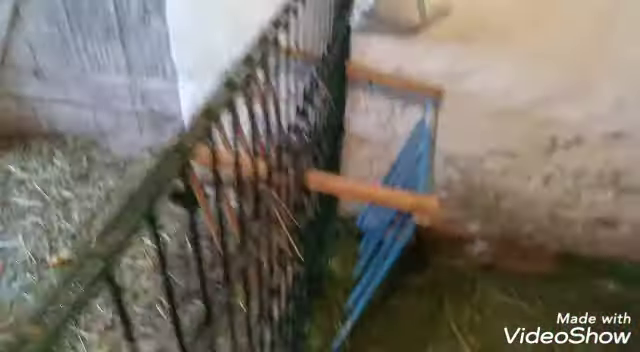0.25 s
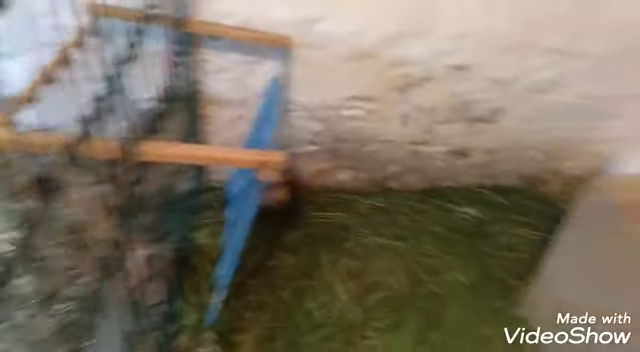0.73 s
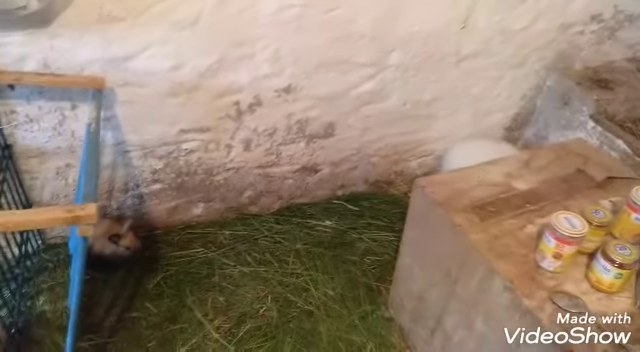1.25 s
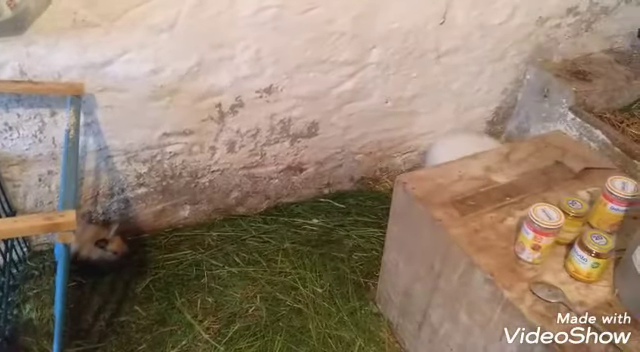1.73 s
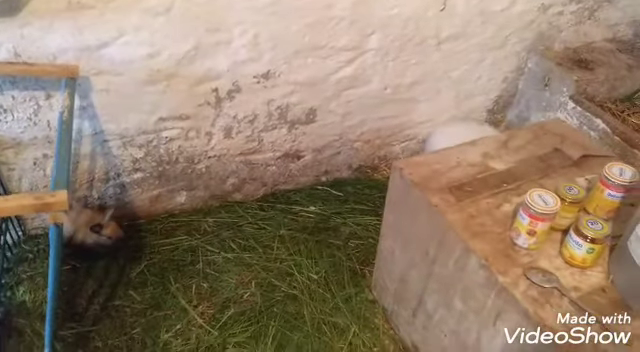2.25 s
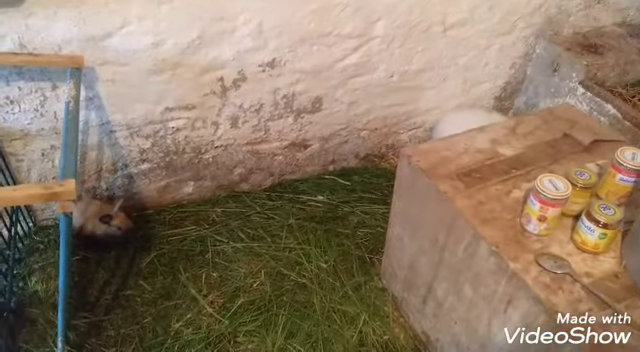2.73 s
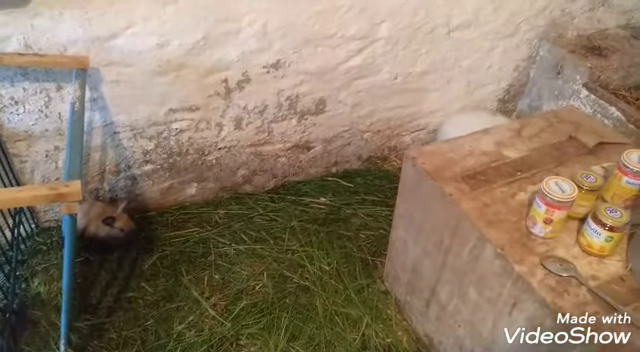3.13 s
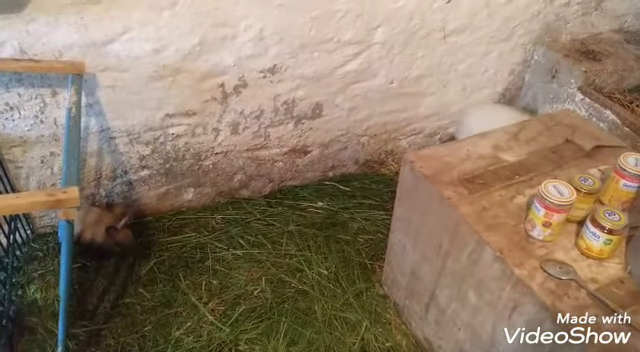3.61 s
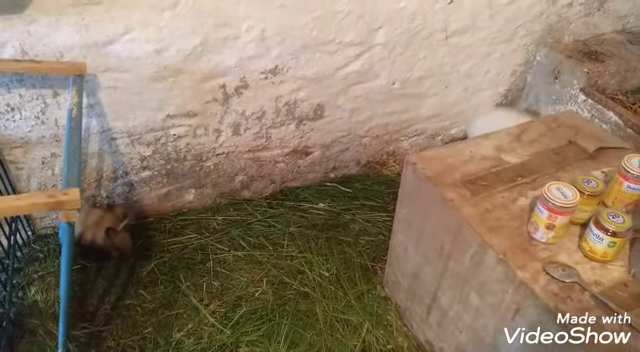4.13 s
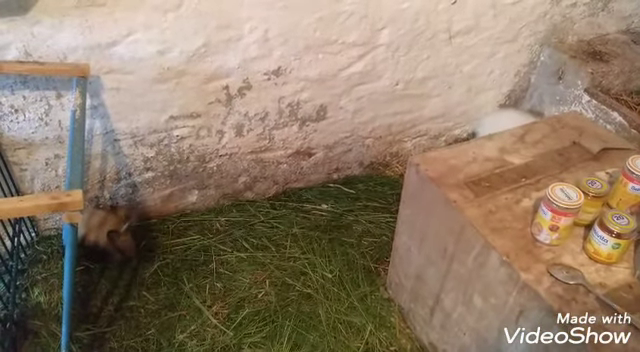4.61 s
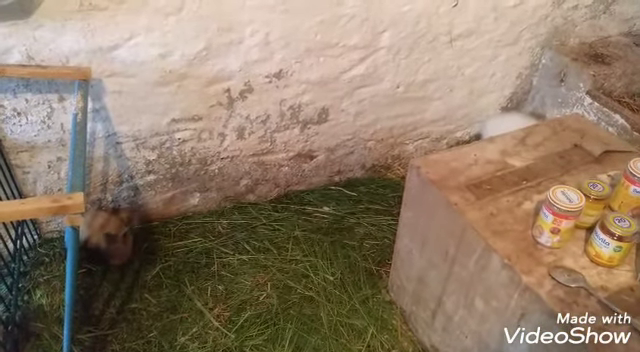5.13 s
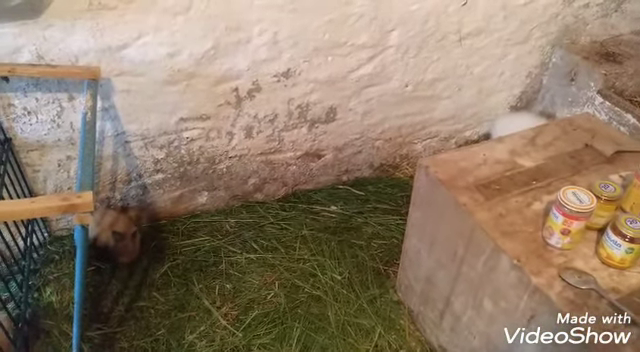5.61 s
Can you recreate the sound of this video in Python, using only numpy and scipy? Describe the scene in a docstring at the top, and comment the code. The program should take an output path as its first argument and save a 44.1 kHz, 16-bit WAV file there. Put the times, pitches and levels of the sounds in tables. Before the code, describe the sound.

A guinea pig in a hard-walled barn pen repeats short squeaky whistles about three times a second, over faint grass rustle.

```python
"""A guinea pig squeaks about three times a second in a hard-walled barn pen, a little to the right.
Each call has two voices: a thin whistle near 6 kHz and a low arched note that chops it into side tones.
The note is a sum of harmonics; it drops and breaks into a huff of shaped noise with a soft thump.
Grass rustles as bursts of crackling noise, echoes and room modes ring on, and faint air noise lies below."""
import sys
import numpy as np
from scipy import signal
from scipy.fft import rfft, irfft, next_fast_len
from scipy.io import wavfile
from scipy.ndimage import uniform_filter1d

SR = 44100
rng = np.random.default_rng(int(sys.argv[2]) if len(sys.argv) > 2 else 0)


def put_to_file(sound):
    """Save the sound as 16-bit audio at rate SR, in the file named by the first command-line argument."""
    columns = np.atleast_2d(sound).T  # one column per channel
    safe = np.clip(columns, -1, 1)
    whole_steps = np.round(safe * 32767)
    wavfile.write(sys.argv[1], SR, whole_steps.astype(np.int16))


N = 258411
TIME = np.arange(N) / SR

# low notes: (start [s], rise [s], fall [s], top [Hz], end [Hz], level [dB], swell from onset to top [dB],
#             overtones [dB], second partial lift [dB], closing rasp [dB], thump [dB])
LOW_NOTES = [ (-.06, 0.038, 0.036, 575, 565, -35.5, 5, -61, -5, -80, -82),
             (0.186, 0.045, .07, 808, 816, -22.5, 2, -47.5, -3, -70, -64),
             (1.011, .014, .046, 570, 390, -28, -4.5, -45, 2.5, -38, -43.5),
             (1.288, 0.042, 0.033, 500, 394, -28, 6.5, -47, 10, -36.5, -44),
             (1.604, .047, 0.039, 502, 395, -30, 4, -44, 4.5, -39, -42.5),
             (1.944, 0.063, 0.022, 592, 395, -28.5, -1, -44, 2.5, -43.5, -57),
             (2.308, 0.053, 0.027, 585, 396, -27, -1, -42, 3.5, -43.5, -42),
             (2.641, 0.076, .028, 828, 760, -19.5, 8.5, -41.5, 11, -43.5, -50.5),
             (2.857, .009, .026, 690, 520, -33.5, -8, -56, 1, -75, -76),
             (3.123, .018, .07, 380, 310, -44, -5, -46.5, 6.5, -47, -48),
             (3.468, 0.035, 0.071, 532, 399.6, -27.5, 9.5, -46, 8, -48.5, -56.5),
             (3.817, 0.015, .056, 425, 295, -40.5, -7.5, -49, 14, -43, -43),
             (4.131, 0.048, 0.037, 630, 404, -29.5, 2, -45, -7, -40, -46),
             (4.452, 0.038, 0.039, 488, 394.6, -29.5, 9, -45.5, 6.5, -39.5, -43.5),
             (4.793, 0.036, 0.038, 530, 389.4, -28.5, 7.5, -47, 6.5, -42, -43),
             (5.113, 0.055, 0.038, 514, 392.4, -28, 11.5, -46.5, 7.5, -41, -43.5),
             (5.472, 0.061, 0.049, 712, 512, -27.5, 9, -42.5, -1.5, -48.5, -57)]


def amp(db):
    """Decibels to gain."""
    return 10 ** (np.asarray(db) / 20)


def unit(x):
    """Scales to rms 1."""
    return x / np.sqrt(np.mean(x ** 2) + 1e-20)


def read(points, hz):
    """Reads a table on a log-frequency axis."""
    f, value = np.transpose(points)
    return np.interp(np.log(hz + 1), np.log(f + 1), value)


def colour(x, points):
    """Filters by a spectrum in dB."""
    size = next_fast_len(N + 4096)
    gain = amp(read(points, np.fft.rfftfreq(size, 1 / SR)))
    return irfft(rfft(x, size) * gain, size)[..., :N]


def wobble(rate_hz):
    """Low-passed noise of rms 1."""
    lowpass = signal.butter(2, min(rate_hz, 9000), fs=SR, output="sos")
    return unit(signal.sosfilt(lowpass, rng.standard_normal(N)))


def play(calls, fade_s):
    """Joins calls into a gate and one control curve per column."""
    gate = np.zeros(N)
    for call in calls:
        to_edge_s = np.minimum(TIME - call[0][0], call[-1][0] - TIME)
        gate += np.clip(to_edge_s / fade_s + .5, 0, 1)
    gate = np.sin(np.pi / 2 * np.minimum(gate, 1)) ** 2
    s, *columns = np.concatenate(calls).T
    return [gate] + [np.interp(TIME, s, column) for column in columns]


def swell(s, rise_s, fall_s):
    """A bell-shaped envelope with its top at s."""
    return np.exp(-((TIME - s) / np.where(TIME < s, rise_s, fall_s)) ** 2)


def note(start, rise_s, fall_s, top_hz, end_hz, db, swell_db, over_db, lift_db, *huff):
    """One arch of the low voice: rows of (s, Hz, dB, overtones dB, second partial dB, looseness 0-1)."""
    t = np.linspace(0, rise_s + fall_s, num=60)
    early, down = np.clip(1 - t / rise_s, 0, 1), np.clip((t - rise_s) / fall_s, 0, 1)

    # slides up by a share of its pitch, then drops fast and settles
    scoop_share, scoop_bend, drop_bend = .11, 1.6, 2.2
    hz = end_hz + (top_hz - end_hz) * (1 - down) ** drop_bend
    hz = hz * (1 - scoop_share * early ** scoop_bend)

    # the fundamental needs a moment to speak, and swells to the top
    attack_s, attack_db, swell_bend = 0.0059, 14.5, 0.4
    onset_db = attack_db * np.exp(-t / attack_s) + swell_db * early ** swell_bend

    # flares as the pitch breaks; place and width are shares of the fall
    break_db, break_at, break_width = 2.5, 0.37, 0.56
    flare_db = break_db * np.exp(-((down - break_at) / break_width) ** 2)

    # notes that end low keep their level; higher ones fade fully
    held_hz, faded_hz, full_fade_db, fade_bend = 284.2, 382.9, 14, 0.88
    fade_db = full_fade_db * np.interp(end_hz, [held_hz, faded_hz], [0, 1]) * down ** fade_bend

    # overtones come in late, and dip while the pitch breaks
    over_onset_db, over_break_db = 3, 6
    overtones_db = over_db - over_onset_db * early ** 2 - over_break_db * np.sin(np.pi * down)

    lift_growth_db = 4.5  # the second partial grows as the mouth opens
    lift_db = lift_db + lift_growth_db * (np.sin(np.pi * down) - early)

    slack_onset = .3  # looseness already there before the break
    loose = slack_onset + (1 - slack_onset) * np.sqrt(down)
    return np.transpose([start + t, hz, db - onset_db + flare_db - fade_db, overtones_db, lift_db, loose])


def low_voice(jitter=.011, slack_jitter=.035, slack_hz=480, shimmer=0.009, flutter_db=3.0,
              slope_db_per_octave=5, fray_rad=0.12, hiss_db=-8):
    """A strong fundamental with overtones shaped by the throat; also returns its cycle and when it sounds."""
    # throat colour: (frequency [Hz], gain [dB])
    throat = [(600, -7), (850, -1.5), (1050, 0.5), (1250, 8), (1420, 8), (1620, -5.5), (1800, 3),
              (2080, 6.5), (2500, 4.5), (3100, -11), (4000, -14), (6000, -37.5), (15500, -21)]
    gate, hz, db, over_db, lift_db, loose = play([note(*row) for row in LOW_NOTES], 0.018)
    slack = loose * np.clip((slack_hz - hz) / 120, 0, 1)  # loose folds at low pitch beat unevenly
    hz = hz * (1 + (jitter + slack_jitter * slack) * wobble(220))
    cycle = 2 * np.pi * np.cumsum(hz) / SR

    overtones = np.zeros(N)
    for k in range(2, 10):
        partial_db = read(throat, k * hz) + (k == 2) * lift_db - slope_db_per_octave * np.log2(k / 2)
        partial_db = partial_db + flutter_db * wobble(30.53)
        overtones += amp(partial_db) * np.cos(k * cycle + fray_rad * (k - 2) * wobble(220))

    # air leaks through the folds once a cycle
    leak = rng.standard_normal(N) * (1 + np.cos(cycle))
    hiss = unit(colour(leak, [(150, 2)] + throat))
    upper = overtones + amp(hiss_db + 1.8 * slack) * hiss
    tone = amp(db) * np.cos(cycle) + amp(over_db) * upper
    roughness = 1 + (shimmer + 0.42 * slack) * wobble(218)
    return np.sqrt(2) * gate * roughness * tone, cycle, uniform_filter1d(gate, size=600)


def swoop(start, lead_s, sag_s, flip_s, crest_hz, dip_hz, end_hz, crest_db, dip_db, end_db, chop):
    """One whistle creeps in, sags and flips up: rows of (s, Hz, dB, share chopped)."""
    lead_scoop, lead_db = .02, 18.5  # creeps in a little flat and faint
    sag_settle_s, hold_s, hold_db = 0.054, .014, 2.5  # sags toward a low pitch; holds briefly as it dies
    flip_chop = 0.5  # share of the chopping left once flipped up
    stages = np.cumsum([0, lead_s, sag_s, flip_s, hold_s])
    t = np.linspace(0, stages[-1], num=90)
    lead, sag, flip = (np.interp(t, pair, [0, 1]) for pair in zip(stages[:-2], stages[1:]))
    sag = np.expm1(-sag * sag_s / sag_settle_s) / np.expm1(-sag_s / sag_settle_s)
    flip = np.sin(np.pi / 2 * flip) ** 2
    hz = crest_hz + (dip_hz - crest_hz) * sag + (end_hz - dip_hz) * flip
    hz = hz * (1 - lead_scoop * (1 - lead))
    level_db = np.interp(t, stages, [crest_db - lead_db, crest_db, dip_db, end_db, end_db - hold_db])
    return np.transpose([start + t, hz, level_db, chop * (1 - (1 - flip_chop) * flip)])


def whistle(cycle, buzz, jitter=0.00069, rough=0.0022, weak_jitter=0.01197, open_share=0.069, chop_db=3.5,
            octave_db=-11, pure_octave_db=3, octave_growth=0.13, octave_flutter_db=3, flutter_db=2.5,
            breath_db=-24):
    """A near-pure whistle; each low-voice cycle bends it and lets a burst through, throwing out side tones."""
    # (start [s], lead [s], sag [s], flip [s], crest [Hz], dip [Hz], end [Hz],
    #  crest level [dB], dip level [dB], end level [dB], share chopped by the low note [0-1])
    whistle_rows = [ (-.1, 0.034, 0.034, 0.033, 5800, 5700, 5770, -50, -43, -48.5, 0.1),
                    (.151, .048, .19, 0.0258, 5793, 5515, 5610, -34.5, -39.5, -43.5, 0.09),
                    (.578, 0.0218, .125, 0.085, 5776, 5565, 5827, -44.5, -41.5, -39.5, 0),
                    (.955, 0.044, .03, 0.025, 5880, 5720, 6300, -42.5, -45.5, -56.5, 1),
                    (1.251, 0.037, 0.032, 0.023, 5980, 5800, 6520, -44, -41, -50, .9),
                    (1.556, 0.042, 0.033, .032, 6050, 5860, 6370, -44.5, -42.5, -42, 0.78),
                    (1.899, 0.042, 0.058, 0.032, 6240, 5880, 6403, -47, -49.5, -41.5, 0.92),
                    (2.266, 0.04, 0.05, .03, 6220, 5900, 6450, -45.5, -46, -46.5, 1),
                    (2.604, 0.034, 0.083, 0.07, 6280, 5700, 5955, -43, -39, -37.5, 0.59),
                    (2.8, 0.035, 0.016, 0.0364, 5800, 5670, 5970, -42.5, -51.5, -51, 0.95),
                    (3.031, 0.054, 0.047, .045, 5960, 5780, 6720, -51, -53.5, -53.5, 1),
                    (3.426, 0.048, 0.035, 0.036, 6170, 5850, 6500, -50.5, -47.5, -42, 0.93),
                    (3.77, .045, .025, 0.0366, 6110, 5900, 6690, -52.5, -48.5, -55.5, 1),
                    (4.099, 0.038, 0.039, 0.025, 6250, 5780, 6270, -49, -44, -48.5, .95),
                    (4.417, 0.041, 0.042, .025, 6250, 5900, 6568, -50.5, -48.5, -49, 0.97),
                    (4.753, 0.045, 0.03, 0.036, 6200, 5950, 6540, -50.5, -46.5, -47.5, 0.81),
                    (5.077, 0.052, 0.042, 0.042, 6190, 5880, 6550, -45.5, -51.5, -42.5, 0.94),
                    (5.433, 0.031, 0.072, 0.1, 6284, 5820, 6175, -37.5, -48, -42.5, 0.93),
                    (5.838, 0.028, 0.039, .03, 6380, 6000, 6500, -51, -45, -45, 0)]
    # whistle colour: (frequency [Hz], gain [dB])
    squeak_colour = [(1500, -54), (3400, -43), (4200, 5.5), (4900, 1), (5350, 5), (5850, -2.5), (6700, -3),
                     (7800, 1), (10500, 1.5), (13000, -5.5), (15500, -3)]
    gate, hz, db, chop = play([swoop(*row) for row in whistle_rows], 0.0079)
    chop = np.clip(chop, 0, 1) * buzz
    weak = np.clip((-45 - db) / 10, 0, 1)  # weakly blown, it is unsteady
    hz = hz * (1 + (jitter + rough * chop + weak_jitter * weak) * wobble(435))
    phase = 2 * np.pi * np.cumsum(hz) / SR
    bent = phase + 1.5 * chop * np.sin(cycle)

    cycle_share = cycle / (2 * np.pi) % 1
    bursts = unit(0.26 + np.exp(-cycle_share / open_share))
    opening = 1 - chop + chop * amp(chop_db) * bursts
    breath = unit(colour(rng.standard_normal(N), [(3000, -97), (6300, 88.0), (8000, 25.5), (15000, -9)]))

    # its octave flickers, and grows when it is blown harder
    octave_level_db = octave_db + pure_octave_db * (0.5 - chop) + octave_growth * (db + 28)
    octave = amp(octave_level_db + octave_flutter_db * wobble(6))
    tone = np.sin(bent) + octave * np.sin(2 * bent) + amp(breath_db) * (1 + 3 * weak) * breath
    level = amp(db + flutter_db * wobble(56))
    return colour(np.sqrt(2) * gate * level * opening * tone, squeak_colour)


def huffs(rise_s=0.037, fall_s=0.028, grain_db=-1.5, thump_s=0.064, thump_db=-3):
    """A grainy noise rasp after each note, and a soft low noise thump under it."""
    # rasp colour: (frequency [Hz], gain [dB])
    rasp_colour = [(25, -15), (120, 4.5), (350, 4), (800, -1.5), (1100, 6), (1550, 12.5), (2000, 1),
                   (2550, 5), (3300, -5.5), (5500, -12.5), (9000, -14.5), (15500, -35)]
    # thump colour: (frequency [Hz], gain [dB])
    thump_colour = [(20, -67), (35, -30), (55, -24), (88, 4), (125, -15), (250, -12), (600, -53),
                    (2000, -66)]
    rasp_after_s, thump_after_s = 0.019, 0.037  # tops, after the end of the note
    rasp_level, thump_level = np.zeros(N), np.zeros(N)
    for start, note_rise_s, note_fall_s, *_, rasp_row_db, thump_row_db in LOW_NOTES:
        end = start + note_rise_s + note_fall_s
        rasp_level += amp(rasp_row_db) * swell(end + rasp_after_s, rise_s, fall_s)
        thump_level += amp(thump_row_db) * swell(end + thump_after_s, 0.028, thump_s)
    grains = rng.standard_normal(N) * amp(grain_db * wobble(360))
    rasp = rasp_level * unit(colour(grains, rasp_colour))
    thump = thump_level * unit(colour(rng.standard_normal(N), thump_colour))
    return rasp + amp(thump_db) * thump


def grass():
    """Clumps of tiny crackles from stalks being pressed and brushed."""
    # (time of top [s], half length [s], level [dB], treble lift [dB per octave])
    rustle_rows = [(0.25, 0.088, -56, -4), (0.477, 0.055, -59, -7), (0.662, 0.062, -56.5, -4),
                   (0.809, 0.057, -58, -6), (2.968, 0.017, -58.5, -3), (3.721, 0.03, -57.5, 1.5),
                   (3.789, 0.025, -59, -6), (5.761, 0.038, -63.5, -5.5)]
    # stalk colour: (frequency [Hz], gain [dB])
    stalk_colour = [(25, -55), (100, -20.5), (400, -16.5), (900, -4.5), (1600, -3), (2300, 2), (3600, -6.5),
                    (6000, -2.5), (10000, 5), (15500, 0)]
    out = np.zeros(N)
    crackle = rng.standard_normal(N) * amp(2.5 * wobble(300) + 1.5 * wobble(30))
    for s, half_s, db, lift in rustle_rows:
        tilted = [(f, level + lift * np.log2(f)) for f, level in stalk_colour]
        out += amp(db) * swell(s, half_s, half_s) * unit(colour(crackle, tilted))
    return out


def barn(x, lag_ms=0.309, early_db=-9, early_t60_s=0.027):
    """The direct sound reaches the right port first; near walls answer at once and the room rings on."""
    # decay time: (frequency [Hz], t60 [s])
    ring_t60 = [(90, 0.28), (250, 0.66), (530, 0.53), (800, 0.53), (1400, 0.44), (3700, 0.35), (6000, 0.27),
                (12000, 0.41)]
    # ring against the direct sound: (frequency [Hz], level [dB])
    ring_level = [(90, -5), (500, 3.5), (1500, -2.5), (6000, 1), (14000, 1)]
    # echoes off the near wall, floor and box: (delay [ms], level [dB], lag of the left port [ms])
    echo_rows = [(2.31, -11, 0.525), (4.994, -16.5, -0.178), (7.88, -43, 0.22), (13.63, -13.5, -0.22),
                 (20.79, -20.5, 0.34)]
    taps_per_s = 3000
    t = TIME[:SR]
    taps = rng.choice([-1., 1.], (2, 2, SR)) * (rng.random((2, 2, SR)) < taps_per_s / SR)

    # late ring: sparse random taps, decaying by frequency
    hz, at, z = signal.stft(taps[0] * np.clip((t - .008) / 0.004, 0, 1), SR, nperseg=256)
    t60 = read(ring_t60, hz)[:, None]
    even_energy = np.sqrt(np.log(1e6) / t60 / taps_per_s)
    z = z * amp(read(ring_level, hz)[:, None] - 60 * at / t60) * even_energy
    late = signal.istft(z, SR, nperseg=256)[1][:, :SR]

    early = taps[1] * (t > .002) * amp(-60 * t / early_t60_s)  # scatter from bars and clutter
    rings = late + amp(early_db) * early / np.linalg.norm(early[0])

    size = next_fast_len(N + SR)
    hz, (a, b) = np.fft.rfftfreq(size, 1 / SR), rfft(rings, size)
    same = np.sinc(hz / 1250)  # long waves reach both ports alike
    ports = np.array([same * a + np.sqrt(1 - same ** 2) * b, a])
    turn_per_ms = -2j * np.pi * hz / 1000
    for ms, db, lag in [(0.037, 0, lag_ms)] + echo_rows:  # direct sound first
        ports += amp(db) * np.exp(np.outer([ms + lag, ms], turn_per_ms))
    return irfft(rfft(x, size) * ports, size)[:, :N]


def standing_waves(x):
    """A few room modes between the walls hum on after each note, in a different phase at each port."""
    # (frequency [Hz], level [dB], t60 [s])
    mode_rows = [(448, -8, 1), (562, -19, 0.41), (606, -4, .85), (644, -44, 0.59), (770, -5, 0.72)]
    t, phases = TIME[:SR], rng.uniform(0, 2 * np.pi, (len(mode_rows), 2, 1))
    rings = np.zeros((2, SR))
    for (hz, db, t60), phase in zip(mode_rows, phases):
        even_peak = 2 * np.log(1000) / (t60 * SR)  # same resonant gain for any t60
        rings += amp(db - 60 * t / t60) * even_peak * np.cos(2 * np.pi * hz * t + phase)
    return signal.fftconvolve(x[None], rings, axes=1)[:, :N]


def air():
    """Faint barn rumble and hiss: shaped noise, deepest rumble separate per port, bass above it partly shared."""
    # air colour: (frequency [Hz], gain [dB])
    air_colour = [(15, -46), (25, -40), (82, -5), (349, -13), (523, -15.5), (703, -24), (919, -13),
                  (1800, -18.5), (2490, -14), (3630, -21.5), (6380, -26.5), (12500, -29), (15500, -32.5)]
    # slow level curve: (time [s], level [dB])
    air_level = [(0, -1.8), (3, -0.5), (3.4, -4.5), (4.7, -3), (5.86, -2)]
    base_db = -58.5
    own = colour(rng.standard_normal((2, N)), [(20, 38), (100, -3.5), (900, -3.0)])
    shared = colour(rng.standard_normal(N), [(20, -68), (50, 3.0), (200, -1.5), (1500, -20)])
    drift_db = .6 * wobble(3)
    level_db = np.interp(TIME, *np.transpose(air_level)) + drift_db
    return amp(base_db) * unit(colour(own + shared, air_colour)) * amp(level_db)


def scene():
    """The animal and the grass in the barn, over the still air."""
    voice, cycle, buzz = low_voice()
    animal = amp(-6.5) * voice + amp(-4) * whistle(cycle, buzz) + amp(-5.0) * huffs()
    return barn(animal + amp(3.0) * grass()) + standing_waves(animal) + air()


def record(dry):
    """The two ports differ in colour; then the band limit."""
    # port balance: (frequency [Hz], left minus right [dB])
    balance = [(60, 0), (110, -1.5), (200, -2), (380, 0.5), (700, -1.5), (1290, 2.5), (2380, 4.5),
               (4400, -3.5), (8120, -4.5), (15000, -11)]
    edge_hz = 15750
    ports = []
    for x, side in zip(dry, (1, -1)):
        ports.append(colour(x, [(f, side * db / 2) for f, db in balance]))
    lowpass = signal.firwin(511, edge_hz, window=("kaiser", 9), fs=SR)
    return signal.oaconvolve(np.array(ports), lowpass[None], "same")


dry = scene()
out = record(dry)
put_to_file(out)
```